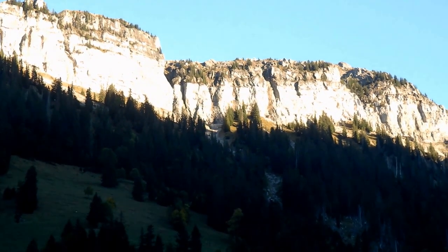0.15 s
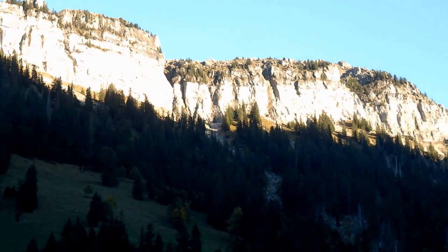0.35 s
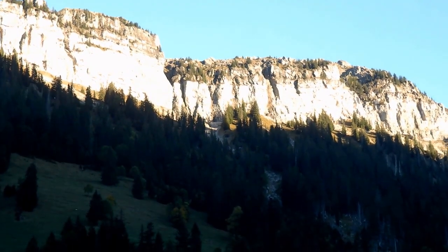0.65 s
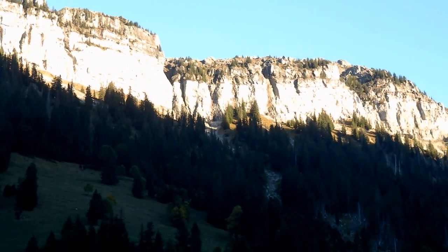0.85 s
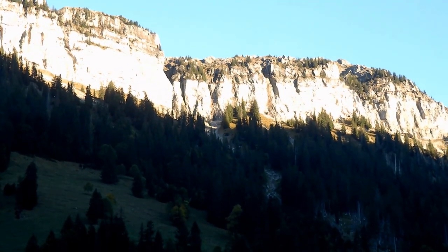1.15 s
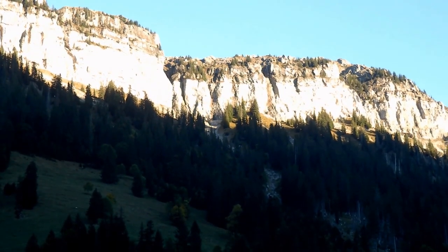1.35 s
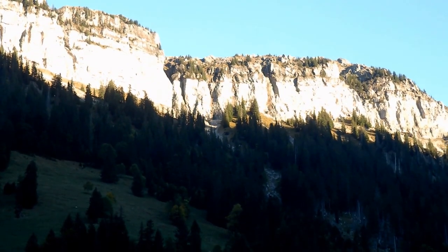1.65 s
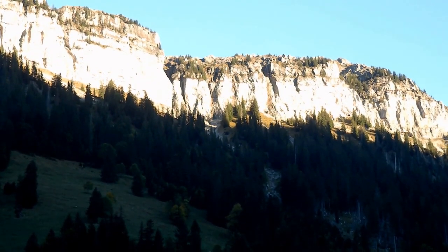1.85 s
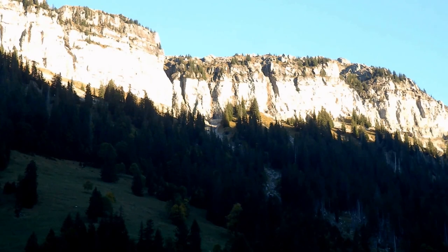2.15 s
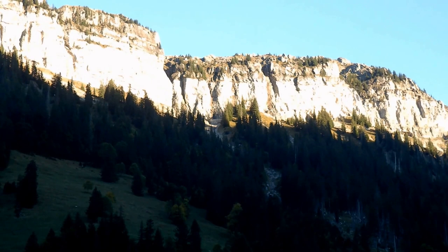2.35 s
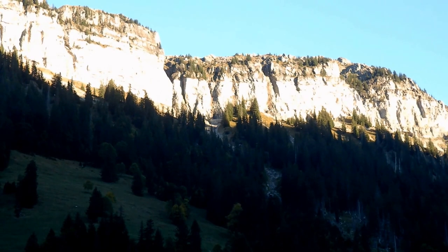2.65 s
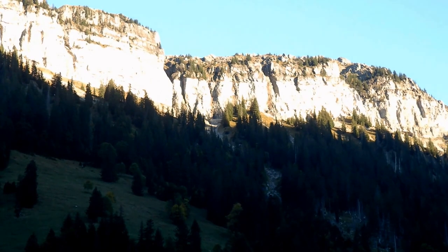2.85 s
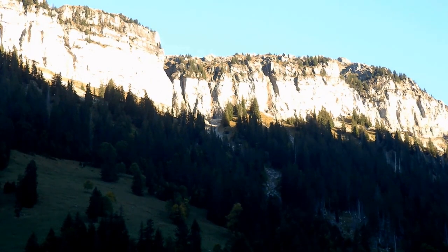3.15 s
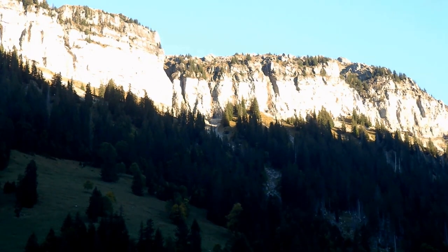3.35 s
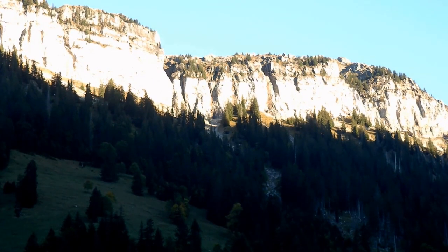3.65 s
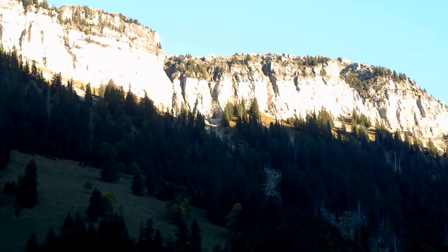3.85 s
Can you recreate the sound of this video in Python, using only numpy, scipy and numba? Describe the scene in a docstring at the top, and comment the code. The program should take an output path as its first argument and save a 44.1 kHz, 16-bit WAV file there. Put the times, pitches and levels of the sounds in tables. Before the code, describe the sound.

Low wind buffeting dominates, much stronger on the right: scattered thumps at first, dense from 1.9 to 2.6 seconds, a lull near 2.9, then heavy gusts with the hardest thump at 3.7. Far off, probably a stag roars hoarsely at 0-0.7, groaning down until 1.3, and again at 2.05-2.85, with valley echo. Beneath lie low murmur, steady hiss, faint rustle around 2.3-2.8 and tiny dry ticks.

```python
"""Windy valley with a distant roaring animal

Gusts of shaped noise buffet a microphone, mostly its right port, with hard thumps made of short pressure dips.
Far off an animal, probably a rutting stag, roars twice, with lower groans after each roar's start:
throat pulses and rasp ring moving resonances, and decaying noise stands for the echo of the slopes.
Under it lie a low valley murmur, a faint rustle, a few ticks and a steady-coloured hiss, all shaped noise."""
import sys
import numpy as np
from scipy import signal
from scipy.fft import rfft, irfft
from scipy.io import wavfile
from scipy.ndimage import uniform_filter1d
from numba import njit

SR = 44100
rng = np.random.default_rng(int(sys.argv[2]) if len(sys.argv) > 2 else 0)


def int16_out(signal):
    """Quantize to a 16-bit WAV file."""
    q = np.round(np.clip(np.atleast_2d(signal).T, -1, 1) * 32767)
    wavfile.write(sys.argv[1], SR, q.astype(np.int16))


N = 176400  # samples, 4 seconds
T = np.arange(N) / SR  # seconds
FREQS = np.arange(N // 2 + 1) * SR / N + 1e-3  # Hz, nudged off zero so its logarithm exists


def undb(db):
    """Turn decibels into gain."""
    return 10 ** (np.asarray(db) / 20)


def unit(x):
    """Scale to an rms of 1."""
    return x / np.sqrt(np.mean(x ** 2))


def curve(rows, axis=1):
    """Join one column of a table by straight lines in time."""
    rows = np.array(rows)
    return np.interp(T, rows[:, 0], rows[:, axis])


def noise(colour):
    """Make noise of rms 1 whose spectrum follows points of (Hz, dB)."""
    hz, db = np.array(colour).T
    shape_db = np.interp(np.log(FREQS), np.log(hz), db)
    white = rng.standard_normal(N)
    return unit(irfft(rfft(white) * undb(shape_db), N))


def low_pass(x, hz):
    """Soften what lies above hz, without delaying the sound."""
    return irfft(rfft(x) / (1 + (FREQS / hz) ** 2), N)


def resonate(x, hz, width):
    """Ring a steep resonance: two equal band-passes in a row."""
    band_pass = 1 / (1 + 1j * (FREQS ** 2 - hz ** 2) / (FREQS * width))
    return irfft(rfft(x) * band_pass ** 2, N)


def walk(rate):
    """Drift smoothly at random, with an rms of 1 and `rate` new values per second."""
    knots = np.arange(int(T[-1] * rate) + 2)
    values = rng.standard_normal(2048)[knots]
    zigzag = np.interp(T * rate, knots, values)
    return unit(uniform_filter1d(zigzag, int(SR / rate / 2)))


@njit
def sweep(x, hz, width):
    """Filter with a band-pass whose centre moves, updating its two memories at every sample."""
    y = np.empty(len(x))
    band, low = 0., 0.
    for i in range(len(x)):
        g = np.tan(np.pi * hz[i] / SR)
        damping = width / hz[i]
        v = (band + g * (x[i] - low)) / (1 + g * (g + damping))
        band = 2 * v - band
        low = low + 2 * g * v
        y[i] = damping * v
    return y


# Tone colour of the hiss. Each row: frequency in Hz, relative level in dB.
HISS_COLOUR = [(100, 16.5), (1000, 4), (2400, -0.5), (3300, -7), (4200, -10), (5200, -5), (6500, 2),
               (7800, 3), (9000, 2), (15500, 4.5)]
# How loud the hiss is. Each row: time in seconds, level in dB before HISS_DB is added.
HISS_LEVEL = [(0.0, -63.5), (0.03, -64), (0.05, -66.5), (0.55, -66), (0.59, -65.5), (1.02, -65.5),
              (1.38, -65.5), (1.48, -64.5), (2.08, -67.5), (2.1, -64.5), (3.04, -64), (3.07, -67),
              (3.45, -64), (3.55, -69), (3.58, -63), (3.74, -66), (3.91, -64), (3.97, -68)]
HISS_DB = 9


def hiss():
    """Steady-coloured hiss, separate on each side, with one shared level that rises and falls."""
    level_db = HISS_DB + curve(HISS_LEVEL) + 0.93 * walk(16)
    return undb(level_db) * np.array([noise(HISS_COLOUR), noise(HISS_COLOUR)])


# Tone colour of the far murmur. Each row: frequency in Hz, relative level in dB.
MURMUR_COLOUR = [(20, 0.5), (60, 1.5), (120, -14), (160, 5), (210, -6.5), (330, -3.5), (480, -8),
                 (640, -16), (900, -24), (1300, -39), (2500, -48), (5000, -95)]
# How loud the murmur is. Each row: time in seconds, level in dB.
MURMUR_LOUDNESS = [(0, -42.5), (.7, -46.5), (1.25, -45), (1.7, -49.5), (2.6, -42), (3.2, -50.5), (4, -46)]


def valley_murmur():
    """Low far noise, nearly alike on both sides: a strong shared part and a weak opposed part."""
    mid = noise(MURMUR_COLOUR) * undb(1.14 * walk(7))
    side = undb(-15.5) * noise(MURMUR_COLOUR)
    return np.array([mid + side, mid - side]) * undb(curve(MURMUR_LOUDNESS))


# Tone colour of the rustle. Each row: frequency in Hz, relative level in dB.
RUSTLE_COLOUR = [(400, -16), (700, -3), (900, 6.5), (1400, 7.5), (2500, 3), (4000, -4.5), (7500, 2.5),
                 (10000, -14), (15000, -9.5)]
# How loud the rustle is. Each row: time in seconds, level in dB.
RUSTLE_LOUDNESS = [(0, -97), (.198, -62), (.3, -88), (2.05, -72), (2.35, -60), (2.48, -61), (2.62, -56.5),
                   (2.7, -60), (2.765, -58), (2.84, -62.5), (2.95, -73.5), (3.15, -70.5), (3.4, -64),
                   (3.7, -69), (4, -62.5)]


def rustle():
    """Separate bright noise on each side swells and flickers with one shared level."""
    level_db = curve(RUSTLE_LOUDNESS) + 1.4 * walk(24.68)
    return np.array([noise(RUSTLE_COLOUR), noise(RUSTLE_COLOUR)]) * undb(level_db)


# Faint ticks nearby. Each row: start in seconds, level at the start in dB, centre in Hz,
# width of each band-pass in Hz, decay in seconds.
TICK_ROWS = [(1.662, -53.5, 2020, 2600, 0.0038), (1.662, -57, 5940, 3000, 0.0042),
             (1.887, -58, 5600, 7000, .004), (2.321, -46, 2050, 1680, 0.0048),
             (3.883, -51, 7800, 1800, 0.0023)]


def ticks():
    """Tiny dry snaps: band-limited noise starts abruptly and dies away in a few milliseconds."""
    out = np.zeros((2, N))
    for at, db, hz, width, decay in TICK_ROWS:
        grain = unit(resonate(rng.standard_normal((2, N)), hz, width))
        envelope = (T >= at) * np.exp(-abs(T - at) / decay)
        out += undb(db) * grain * envelope
    return out


RASP = 0.24  # share of breath noise in the two roars
JITTER = 0.007  # random pitch wobble of the two roars, as a fraction of the pitch
SHIMMER_DB, SHIMMER_RATE = 2.2, 22  # flutter of each resonance: size in dB, new values per second


def roar(rows, throat, jitter, second_pulse, rasp, fade_s=0.15):
    """Throat pulses, weaker ones midway between and rasp ring fluttering resonances that follow the pitch."""
    pitch = curve(rows)
    cycles = np.cumsum(pitch * (1 + jitter * walk(40.25))) / SR
    main_pulses = np.diff(np.floor(cycles), prepend=0)
    midway_pulses = np.diff(np.floor(cycles + 0.5), prepend=0)
    pulses = main_pulses + second_pulse * midway_pulses
    # the breath noise is strongest at the start of each cycle
    breath = rng.standard_normal(N) * np.exp(-2 * (cycles % 1))
    source = unit(pulses) + rasp * unit(breath)
    glide = pitch / np.mean([row[1] for row in rows])
    call = 0
    for k, (hz, width, follow) in enumerate(throat):
        centre = hz * glide ** follow
        ring = sweep(sweep(source, centre, float(width)), centre, float(width))
        level_db = curve(rows, axis=k + 2) + SHIMMER_DB * walk(SHIMMER_RATE)
        call = call + (-1) ** k * unit(ring) * undb(level_db)  # neighbours have opposite sign
    # fade in before the first row and out after the last one
    fade = np.clip(np.minimum(T - rows[0][0], rows[-1][0] - T) / fade_s + 1, 0, 1)
    return call * fade


# The two roars. Each row: time in seconds, pitch in Hz before jitter, then the levels in dB of the
# first, second and third throat resonance before shimmer and the level of the whole roar are added.
FIRST_ROAR = [(0, 80, -5, -8, -40), (.07, 80.3, -3, -9, -34), (.15, 81.2, 2, -6, -32),
              (.25, 80, -1, -7, -27), (.3, 76.6, -6, -6, -32), (.44, 72.8, -7, 2, -34),
              (.54, 70.1, -13, 5, -32), (.66, 64.6, -7, 0, -31), (.74, 62, -13, -14, -40)]
SECOND_ROAR = [(2.05, 65, -16, -22, -45), (2.13, 66.3, 0, -13, -40), (2.22, 69, 1, -7, -35),
               (2.35, 67.3, 0, 1, -15), (2.44, 66.2, 3, 3, -16), (2.56, 65.3, 1, 0, -18),
               (2.66, 64.4, 0, 0, -18), (2.78, 63.4, 0, 0, -14), (2.85, 62, -16, -16, -26)]
# Throat resonances of each roar. Each row: centre in Hz at the average pitch, width of each
# band-pass in Hz, and the power with which the centre follows the pitch glide (0 stays, 1 follows fully).
FIRST_THROAT = [(384, 42, 0.52), (495, 67, .1), (1197, 53, 0.25)]
SECOND_THROAT = [(399, 77, 0.21), (509, 87, 1), (1238, 60, 0.73)]
# The lower groans. Each row: time in seconds, pitch in Hz before jitter, level in dB of their one
# resonance before shimmer and GROAN_DB are added.
FIRST_GROAN = [(.62, 74.4, 4), (.69, 71.97, 6), (.77, 69, -4.5), (.87, 66.17, -6), (1.02, 63.27, -13),
               (1.15, 59.8, 5.5), (1.35, 55.1, -6)]
SECOND_GROAN = [(2.58, 73.04, 3), (2.67, 70.7, 3.5), (2.76, 67.6, 6), (2.86, 60.5, -21)]
# The resonance of the groans, with the same columns as the throats above.
GROAN_THROAT = [(340.4, 60, 0.64)]
ROAR_1_DB, ROAR_2_DB, GROAN_DB = -51, -54, -55.5


def stag_calls():
    """Add the two roars and the two groans, which share the same way of making sound."""
    first = roar(FIRST_ROAR, FIRST_THROAT, JITTER, second_pulse=0.028, rasp=RASP)
    second = roar(SECOND_ROAR, SECOND_THROAT, JITTER, second_pulse=0.38, rasp=RASP)
    groans = 0
    for rows in (FIRST_GROAN, SECOND_GROAN):
        groans = groans + roar(rows, GROAN_THROAT, jitter=0.012, second_pulse=0.082, rasp=0.27)
    return undb(ROAR_1_DB) * first + undb(ROAR_2_DB) * second + undb(GROAN_DB) * groans


ECHO_DB = -7
VALLEY_T60_S = 1.6  # seconds for the echo to fall by 60 dB


def stag():
    """The calls arrive alike on both sides; the slopes smear them into a long, slightly wide echo."""
    calls = stag_calls()
    slopes = rng.standard_normal((2, N)) * np.exp(-np.log(1000) * T / VALLEY_T60_S)
    slopes = unit(slopes) / np.sqrt(N)
    mid, side = signal.fftconvolve(calls[None], slopes, axes=1)[:, :N]
    echo = mid + undb(-15.0) * np.array([side, -side])
    return calls + undb(ECHO_DB) * echo


# Tone colour of the steady turbulence. Each row: frequency in Hz, relative level in dB.
TURBULENCE_COLOUR = [(15, -15), (25, -6.5), (40, 2), (75, 1), (120, -5.5), (180, -16.5), (260, -25.5),
                     (400, -42.5), (600, -56), (900, -70), (2000, -110)]
WIND_DB = 8  # added to every wind level
EDDY_HZ = 128  # above this the turbulence grows faster than the gust
EDDY_DB, EDDY_RATE = 5.5, 35  # flutter of the small eddies: size in dB, new values per second
BRIGHTEN = 0.65  # extra dB of small eddies for each dB of gust
GUST_REF_DB = -28  # gust level at which the small eddies get no extra gain


def port(gust_db):
    """Turbulence on one port: its small eddies flutter, and it brightens as the gust grows."""
    flow = noise(TURBULENCE_COLOUR)
    flow = flow / np.sqrt(uniform_filter1d(flow ** 2, size=4000))  # even out the slow swells
    large = low_pass(flow, EDDY_HZ)
    eddy_gain_db = BRIGHTEN * (gust_db - GUST_REF_DB) + EDDY_DB * walk(EDDY_RATE)
    small = (flow - large) * undb(eddy_gain_db)
    return (large + small) * undb(gust_db + WIND_DB)


# Wind at the right port, in stretches. Each row: time in seconds, level in dB before WIND_DB is added.
GUST_STRETCHES = [
    [(0.0, -47), (0.104, -32), (0.304, -41.5), (0.36, -31.5), (0.472, -55), (0.504, -33.5), (0.57, -71),
     (0.6, -35), (0.774, -65), (0.802, -34.5), (0.84, -38), (0.878, -54), (0.942, -45), (1.14, -75)],
    [(1.16, -53), (1.19, -33.5), (1.26, -42), (1.31, -34), (1.47, -39), (1.538, -44.5), (1.596, -35),
     (1.626, -45), (1.75, -39), (1.8, -48.5), (1.9, -35.5), (2.07, -36.5), (2.13, -37)],
    [(2.17, -30), (2.26, -31.5), (2.35, -32), (2.38, -33.5), (2.47, -33.5), (2.616, -31.5), (2.74, -37.5),
     (2.848, -47), (2.9, -49), (2.962, -42), (3.02, -32.5), (3.06, -36.5)],
    [(3.11, -35.5), (3.148, -47), (3.18, -29), (3.226, -32), (3.292, -37.5), (3.39, -30), (3.43, -37.5),
     (3.476, -29.5), (3.55, -40.5), (3.62, -27), (3.646, -34), (3.69, -28.5)],
    [(3.76, -33), (3.82, -33.5), (3.88, -38), (3.926, -32), (3.985, -26)],
]
# Wind at the sheltered left port. Each row: time in seconds, level in dB before WIND_DB and LEE_DB are added.
SHELTERED_WIND = [(0, -27), (.07, -29), (.27, -28), (.4, -32), (1.1, -41), (1.32, -34), (1.6, -48),
                  (1.84, -33), (1.9, -28), (2.12, -31.5), (2.3, -26.5), (2.7, -31), (2.9, -43), (3.14, -24),
                  (3.36, -28.5), (3.6, -41), (3.8, -38), (3.98, -23.5)]
LEE_DB = -19.5
EDGE_S = 0.008  # fade at the start and the end, in seconds


def wind():
    """Unrelated turbulence strikes both ports; the sheltered left one gets it weaker and duller."""
    gust_db = curve([row for stretch in GUST_STRETCHES for row in stretch])
    left = undb(LEE_DB) * low_pass(port(curve(SHELTERED_WIND)), 190)
    right = port(gust_db)
    ramp = np.clip(np.minimum(T, T[-1] - T) / EDGE_S, 0, 1)
    fade = np.sin(np.pi / 2 * ramp) ** 2
    return np.array([left, right]) * fade


# Single eddies that thump the right port. Each row: centre in seconds, depth of the dip in dB,
# half length in seconds.
THUMP_ROWS = [(0.098, -21, 0.0029), (0.114, -19.5, 0.0025), (0.186, -22, 0.0069), (0.208, -14.5, 0.0038),
              (.812, -21.5, 0.0027), (1.309, -20.5, 0.0026), (1.387, -14.5, 0.0037), (1.42, -20, .0027),
              (1.923, -13, 0.004), (1.969, -17, 0.0044), (2.014, -9.5, 0.0042), (2.033, -15, 0.0026),
              (2.073, -16, 0.004), (2.174, -12.5, 0.004), (2.232, -10, 0.0029), (2.269, -14, 0.0018),
              (2.275, -18.5, 0.0022), (2.334, -15.5, 0.003), (2.394, -14, 0.00396), (2.418, -10.5, 0.0038),
              (2.468, -16, 0.0022), (2.508, -14.5, 0.0029), (2.515, -22, 0.0018), (2.55, -15, 0.0031),
              (2.601, -16.5, 0.0027), (2.671, -25, .0022), (3.089, -11.5, 0.0026), (3.184, -17.5, 0.0044),
              (3.208, -18, 0.0024), (3.253, -10.5, 0.0033), (3.319, -11, 0.0042), (3.676, -12, 0.0028),
              (3.692, -18, 0.0025), (3.7243, -0.5, 0.0023), (3.734, -9, 0.0044), (3.788, -14.5, 0.0022),
              (3.96, -11, 0.0036)]
THUMP_LEAK_DB = -83  # what reaches the left port, relative to the right


def thumps():
    """Each eddy is a dip in pressure between two smaller rises."""
    out = 0
    for at, db, half in THUMP_ROWS:
        u = (T - at) / half
        out = out + undb(db) * (2 * u ** 2 - 1) * np.exp(-u ** 2)
    return np.array([undb(THUMP_LEAK_DB) * out, out])


def scene():
    """The valley and the far animal, with the wind on the microphone in front."""
    return valley_murmur() + rustle() + ticks() + stag() + wind() + thumps()


TOP_HZ = 15800


def record(dry):
    """Hiss is added, and a steep filter cuts everything above TOP_HZ."""
    top_cut = signal.ellip(10, 0.2, 70, TOP_HZ, fs=SR, output="sos")
    return signal.sosfilt(top_cut, dry + hiss())


dry = scene()
out = record(dry)
int16_out(out)
```